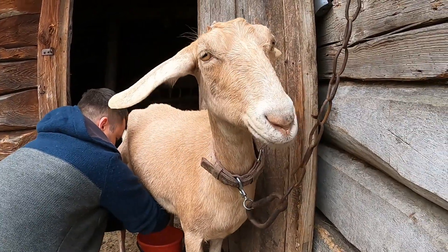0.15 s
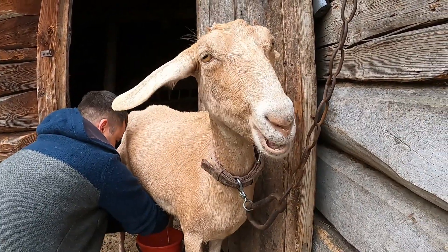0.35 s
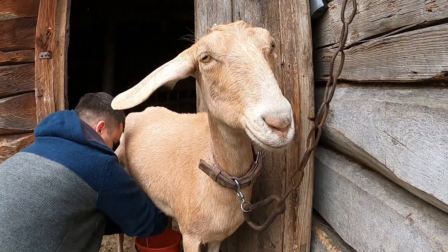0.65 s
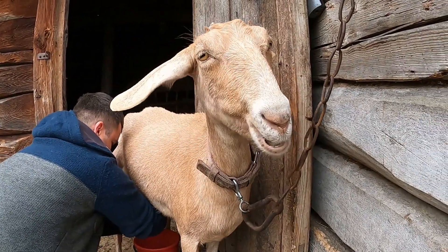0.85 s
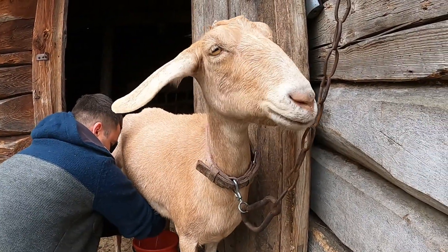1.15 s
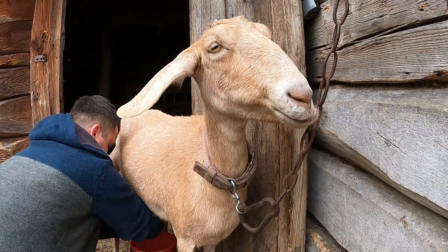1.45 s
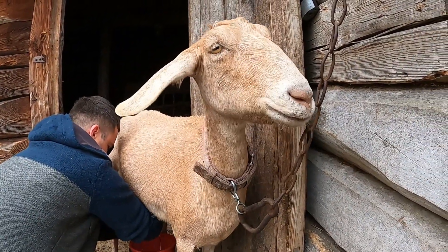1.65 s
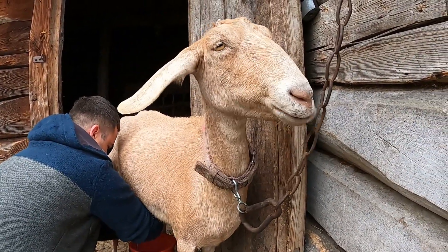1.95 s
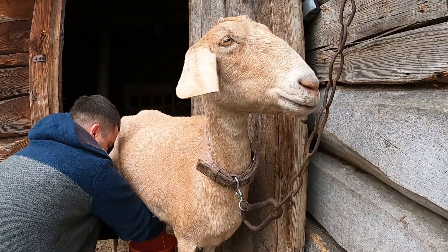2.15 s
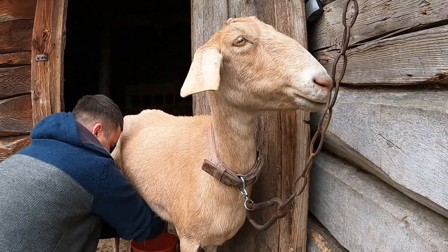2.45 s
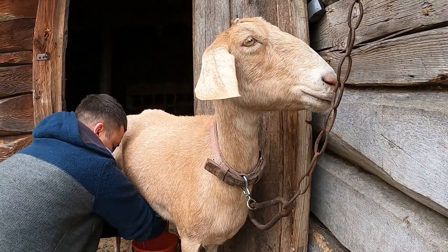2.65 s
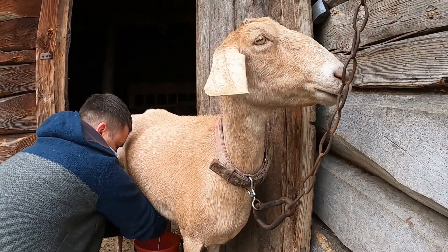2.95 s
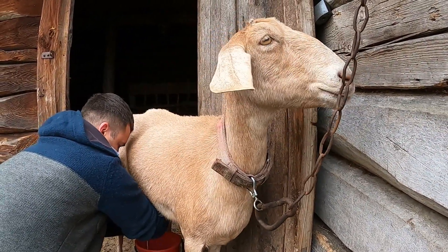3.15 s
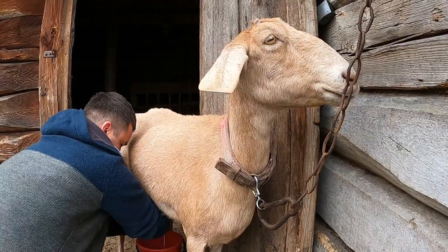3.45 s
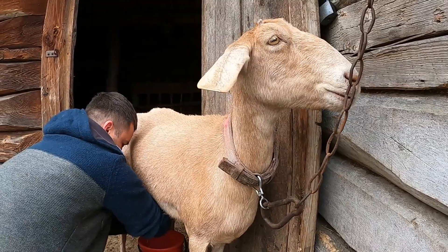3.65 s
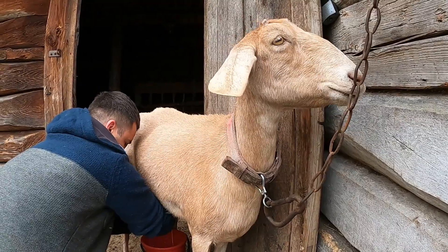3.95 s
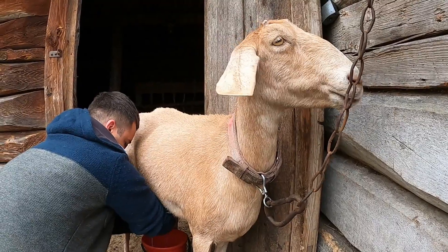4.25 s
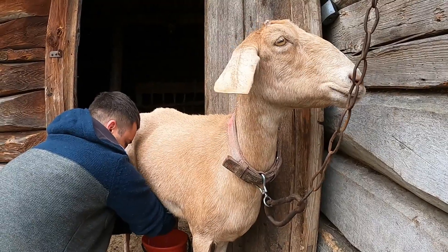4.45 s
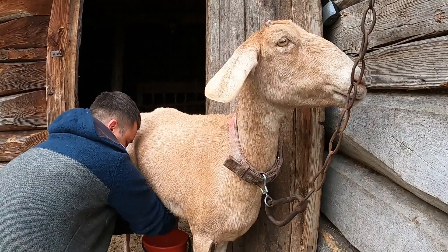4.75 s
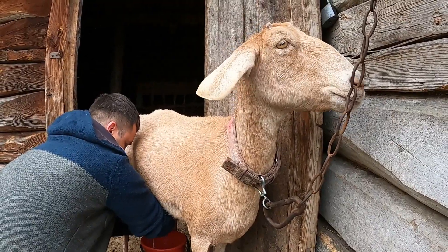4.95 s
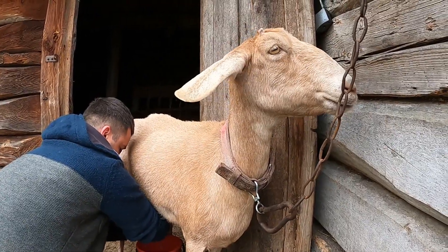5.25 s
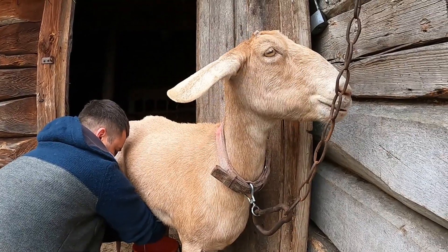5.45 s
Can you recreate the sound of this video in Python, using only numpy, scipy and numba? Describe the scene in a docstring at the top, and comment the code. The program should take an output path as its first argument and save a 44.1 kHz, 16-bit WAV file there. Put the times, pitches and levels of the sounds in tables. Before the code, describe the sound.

Jets of milk squirt rhythmically into a frothy plastic pail, ringing and gurgling, with sharp splats, small glugs and a few dull floor thumps.

```python
"""Jets of milk drive into the froth in a plastic pail as a goat is milked by hand in a barn doorway.
The jets are random drops and bubbles ringing the pail, with a gurgle, a hollow note and hissing spray.
Gouts of milk splat as short rings and noise bursts; big bubbles glug as pairs of climbing tones.
Dull thumps through the wooden floor are low dying tones over rumbling noise.
Bands of faint noise make the farmyard hush."""
import sys
import numpy as np
from scipy import signal
from scipy.io import wavfile
from scipy.ndimage import uniform_filter1d
from numba import njit

SR = 44100
rng = np.random.default_rng(int(sys.argv[2]) if len(sys.argv) > 2 else 0)


def inscribe(sig):
    """Save sig as 16-bit PCM at rate SR to the path in sys.argv[1].

    A 1-D sig is mono; a 2-D sig holds one channel per row.
    Samples are clipped to [-1, 1] before scaling.
    """
    pcm = np.round(np.clip(np.atleast_2d(sig).T, -1, 1) * 32767)
    wavfile.write(sys.argv[1], SR, pcm.astype(np.int16))


N = 247460  # length in samples
STEP_S = 0.002  # spacing of the slow level curves
LEFT_RIGHT = np.array([[1], [-1]])  # opposite signs in the two channels


def undb(db):
    """Turn decibels into a gain."""
    return 10 ** (np.asarray(db) / 20)


def unit(x):
    """Scale a sound to an average (rms) level of 1."""
    return x / np.sqrt(np.mean(x ** 2))


def curve(table):
    """Join the rows of a table by straight lines in time, one curve per column."""
    s, *columns = np.transpose(table)
    return [np.interp(np.arange(N) / SR, s, c) for c in columns]


def smooth(v):
    """Join values spaced STEP_S apart, sample by sample."""
    return np.interp(np.arange(N) / SR, np.arange(len(v)) * STEP_S, v)


def walk(rate):
    """Wander at random: levels held for 1 / rate seconds, then smoothed twice; spread near 1."""
    k = int(SR / rate)
    steps = np.repeat(rng.standard_normal(N // k + 1), k)
    return 0.82 * uniform_filter1d(uniform_filter1d(steps, k), k)[:N]


@njit
def sweep(x, hz, width):
    """Resonance (state-variable band-pass) whose centre can move; gain 1 at the centre."""
    y, band, low = np.empty(len(x)), 0., 0.
    for i in range(len(x)):
        g, k = np.tan(np.pi * hz[i] / SR), width / hz[i]
        v = (band + g * (x[i] - low)) / (1 + g * (g + k))
        band, low, y[i] = 2 * v - band, low + 2 * g * v, k * v
    return y


def svf(x, hz, width):
    """Resonance that stays at one pitch."""
    return sweep(x, np.full(len(x), hz), width)


@njit
def grains(n, sr, start, hz, t60, rise, size, glide):
    """Tones that swell over rise s, then die by 60 dB in t60 s; pitch climbs by the share glide per t60."""
    out = np.zeros(n)
    for e in range(len(start)):
        i0, up, span, phase = int(start[e] * sr), rise[e] * sr, t60[e] * sr, 0.
        for j in range(min(int(up + span), n - i0)):
            phase += 2 * np.pi * hz[e] * (1 + glide * j / span) / sr
            level = size[e] * min(1., j / up) * 1000. ** (-max(0., j - up) / span)
            out[i0 + j] += level * np.sin(phase)
    return out


def ring(x, modes, slosh_db, drift):
    """Sum of resonances; sloshing milk moves each one's strength and pitch."""
    out = 0
    for k, (hz, width, db) in enumerate(modes):
        gain = (-1) ** k * undb(db + slosh_db * walk(40))
        out = out + gain * sweep(x, hz * (1 + drift * walk(9)), 1. * width)
    return out


def coloured(spectrum, flicker_db, wide_hz):
    """Third-octave noise bands that flicker separately; the channels differ more with rising pitch."""
    f, db = np.transpose(spectrum)
    out = 0
    for hz in f[0] * 2 ** np.arange(0, np.log2(f[-1] / f[0]), 1 / 3):
        mid, side = (svf(rng.standard_normal(N), hz, hz / 4) for _ in range(2))
        gain = undb(np.interp(np.log(hz), np.log(f), db) + flicker_db * walk(45))
        out = out + gain * (mid + min(hz / wide_hz, .42) * side * LEFT_RIGHT)
    return unit(out)


def drops(count, scatter_db):
    """Drops that land at random as single clicks; a few are much bigger than the rest."""
    when, big, sign = rng.random((count, 3)).T
    clicks = np.sign(sign - .5) * undb(-scatter_db * np.log(1.003 - big))
    x = np.zeros(N)
    np.add.at(x, (when * N).astype(int), clicks)
    return unit(x)


def bubbles(count, low_hz, high_hz, cycles, scatter_db):
    """Random bubbles whose pitch climbs as they near the surface."""
    when, pitch, big = rng.random((count, 3)).T
    hz = low_hz * (high_hz / low_hz) ** pitch
    size = undb(-scatter_db * np.log(1.01 - big))
    return unit(grains(N, 1. * SR, when * N / SR, hz, cycles / hz, 1.5 / hz, size, 0.28))


def clumps(count, length_s, depth):
    """The stream arrives in short lumps: a gain that jumps for a few milliseconds at random."""
    k = int(length_s * SR)
    lumps = np.abs(drops(count=count, scatter_db=0.5))
    lumps = uniform_filter1d(uniform_filter1d(lumps, k), k)
    return unit(1 + depth * lumps / np.mean(lumps))


EDGE_DB = 30.5  # a swell lies this far down at its ends
RISE_BEND, FALL_BEND = 1.37, 0.66  # larger = rounder top
SPRAY_STEP_DB, SPRAY_ONSET_S = 23, 0.006  # size and duration of the quick jump in spray


def swells(top, rise, hold, fall, db, lead=9, step_db=0):
    """Power of each swell as it rises, holds and falls; it may jump up lead s before its top."""
    t = np.arange(0, N / SR, STEP_S)[:, None]
    before = np.clip((top - t) / rise, 0, 5)
    after = np.clip((t - top - hold) / fall, 0, 5)
    shut = np.clip((top - lead - t) / SPRAY_ONSET_S, 0, 1)
    drop_db = EDGE_DB * (before ** RISE_BEND + after ** FALL_BEND) + step_db * shut
    return undb(db - drop_db) ** 2 + 1e-18


# Squirts of milk; each layer may shift or stretch the times:
# top_s, rise_s, hold_s, fall_s, level_db, gurgle_db and spray_db (both relative to level_db),
# spray_lead_s (spray jumps up this long before top_s), hollow_db (relative), hollow_pitch_hz
SQUIRTS = [(0.0, 0.26, 0.085, 0.33, -52, -2.5, -11.5, .05, -8.5, 1030),
           (0.242, 0.069, 0.036, 0.23, -56.5, -7.5, -6, 0.0053, -5.5, 1310),
           (0.569, 0.14, 0.15, 0.72, -53, -1.5, -6.5, 0.078, 2, 1180),
           (0.696, 0.32, 0.073, 0.43, -44, -5, -17.5, 0.12, -2.5, 1080),
           (0.852, 0.088, 0.029, .1, -55.5, -8, -27, .05, 2, 1070),
           (1.173, 0.11, 0.13, 0.39, -47.5, -3.5, -9.5, 0.093, 1.5, 1228),
           (1.44, 0.12, 0.027, 0.38, -43, -2.5, -12.5, 0.14, -9.5, 1090),
           (1.767, 0.2, 0.13, 0.37, -46.5, -4.5, -10.5, 0.06, -2, 1256),
           (2.003, 0.15, 0.06, 0.2, -62, -6, 0.5, 0.058, -19, 1100),
           (2.105, 0.054, 0.065, 0.067, -51.5, -3.5, -8.5, 0.02, -7, 1236),
           (2.194, 0.026, 0.016, 0.031, -61, 2, -22, .01, -6, 1210),
           (2.452, 0.21, 0.067, 0.13, -47.5, -1.5, -7, 0.0815, 2, 1242),
           (2.672, 0.084, 0.069, 0.18, -52.5, 2.5, -11, 0.02, -6, 1240),
           (2.766, 0.2, 0.043, 0.89, -56.5, -1.5, -10.5, 0.05, -3, 1270),
           (3.083, 0.18, 0.083, 0.15, -49, 3.5, -11, 0.13, -1.5, 1150),
           (3.247, 0.1, 0.061, 0.33, -47, -3, -9.5, 0.066, -1.5, 1060),
           (3.341, 0.074, 0.04, 0.14, -50, -3, -27, .02, 3, 925),
           (3.452, 0.059, 0.04, 0.053, -66, 6.5, -21, .03, -1, 1190),
           (3.631, 0.13, 0.095, 0.19, -49.5, 0.5, -12.5, 0.098, -4.5, 1180),
           (3.906, 0.077, 0.019, 0.16, -43.5, -5.5, -6, 0.051, 0, 1050),
           (3.972, 0.19, 0.091, 0.53, -54, 2, -24, .05, -7.5, 1190),
           (4.224, 0.17, 0.062, 0.12, -52.5, -3.5, -10.5, 0.091, 0.5, 1265),
           (4.468, 0.11, 0.052, 0.26, -49, -1.5, -8, 0.063, -6.5, 1120),
           (4.79, 0.14, 0.066, 0.097, -48.5, -4, -9.5, 0.077, -0.5, 1140),
           (4.996, 0.16, 0.095, 0.47, -51, -3.5, -15, 0.037, -7.5, 1130),
           (5.226, 0.021, 0.004, 0.16, -42, -20, -7.5, 0.0041, -6.5, 1135),
           (5.319, 0.06, 0.082, 0.28, -58.5, -1, -15, 0.052, 2.5, 1280),
           (5.41, .04, 0.051, 0.046, -58, -1, -26, .02, -13, 1230),
           (5.602, 0.087, .05, .2, -43, -6.5, -13.5, 0.093, 2, 1020)]


def flow(relative_db, lag_s, slow_rise, slow_fall, **jump):
    """Gain of a layer that follows the squirts, shifted and stretched in time."""
    top, rise, hold, fall, db = np.transpose(SQUIRTS)[:5]
    power = swells(top + lag_s, slow_rise * rise, hold, slow_fall * fall, db + relative_db, **jump)
    return smooth(np.sqrt(power.sum(axis=1)))


HOLLOW_LAG_S, HOLLOW_RISE_SLOWER = 0.009, 0.72  # the note sets in only once the hole is bored
HOLLOW_SLOWER, HOLLOW_SAG_HZ_PER_S = 0.63, 570  # fall stretch; the note sinks as the hole deepens


def hollow(stream):
    """The hole bored in the froth sings: a narrow air resonance that slides and flutters."""
    top, rise, hold, fall, db, *_, note_db, note_hz = np.transpose(SQUIRTS)
    share = swells(top, rise, hold, fall, db)
    since_s = np.clip(np.arange(len(share))[:, None] * STEP_S - top, -rise, hold + fall)
    sinking_hz = note_hz - HOLLOW_SAG_HZ_PER_S * since_s
    # the strongest squirt has most say in the pitch
    hz = smooth((share * sinking_hz).sum(axis=1) / share.sum(axis=1))
    hz = hz * (1 + 0.066 * walk(40))
    note = unit(sweep(sweep(stream, hz, 230.0), hz, 163.0))
    level = flow(note_db, HOLLOW_LAG_S, HOLLOW_RISE_SLOWER, HOLLOW_SLOWER)
    return note * level * undb(4.2 * walk(110))


# Resonances of the pail with its milk (also used by the splats): pitch_hz, width_hz, level_db (relative)
PAIL = [(852, 170, -2), (1266, 655, -2.5), (1643, 195, 3), (2007, 410, -3), (2368, 166, 1.5),
        (2717, 175, -4), (3260, 420, -7.5), (4880, 690, -16.5)]


def pail_and_froth(stream, waver):
    """Drops ring the pail while small bubbles ring in the froth."""
    pail = unit(ring(stream, PAIL, slosh_db=3.0, drift=0.066))
    froth = bubbles(count=2500, low_hz=567.0, high_hz=3397, cycles=47.0, scatter_db=3.0)
    return unit(pail + undb(-3.5) * froth) * flow(0, 0, 0.82, 0.84) * undb(2.0 * waver)


GURGLE_LAG_S, GURGLE_SLOWER = 0.011, 1.11  # air keeps bubbling up after the jet
GURGLE_SIDE_DB = -10.5  # part of the gurgle differs between the channels
# Resonances of big bubbles under the froth: pitch_hz, width_hz, level_db (relative)
GURGLE = [(164.6, 30.3, -3), (244, 38, -0.5), (329, 58, 0), (379.8, 106, 2.5), (444.4, 206, -3.5),
          (670, 200, -13.5)]


def froth_gurgle():
    """Big bubbles gurgle under the froth: random clicks ring low resonances."""
    middle = unit(ring(drops(count=6000, scatter_db=1.5), GURGLE, slosh_db=1.0, drift=0.066))
    side = unit(ring(drops(count=6000, scatter_db=1.5), GURGLE[1:], slosh_db=2.5, drift=0.077))
    churn = middle + undb(GURGLE_SIDE_DB) * side * LEFT_RIGHT
    gurgle_db = np.transpose(SQUIRTS)[5]
    level = flow(gurgle_db, GURGLE_LAG_S, GURGLE_SLOWER, GURGLE_SLOWER)
    return churn * level * undb(0.39 * walk(29.1))


SPRAY_RISE_SLOWER, SPRAY_FALL_SLOWER = 1.16, 0.79  # stretch of the spray's rise and fall
# Colour of the hissing spray (also used by the splats): pitch_hz, level_db_per_hz (relative)
SPRAY = [(2060, -7), (3500, -1), (4330, 7), (5090, -6), (5480, -1), (8470, -7), (10500, -28), (13300, -51),
         (14600, -46), (15500, -62)]


def mist(lumpy, waver):
    """Tiny bubbles fizz and spray hisses; both set in quickly, then creep up to the top."""
    spray_db, lead_s = np.transpose(SQUIRTS)[6:8]
    level = flow(spray_db, 0, SPRAY_RISE_SLOWER, SPRAY_FALL_SLOWER, lead=lead_s, step_db=SPRAY_STEP_DB)
    fizz = bubbles(count=5000, low_hz=2400, high_hz=9160, cycles=22.0, scatter_db=5.0)
    droplets = fizz * level * undb(-3.5 + 1.0 * waver)
    hiss = coloured(SPRAY, flicker_db=5.0, wide_hz=7540)
    spray = lumpy ** 0.56 * hiss * level * undb(0.35 * waver)
    return droplets, spray


def jet():
    """The stream breaks into drops that ring the pail and whip up froth; its flow wavers quickly."""
    waver = walk(45)
    lumpy = clumps(count=450, length_s=0.0024, depth=0.31)
    stream = lumpy * (drops(count=40000, scatter_db=1.5) + 0.41 * rng.standard_normal(N))
    droplets, spray = mist(lumpy, waver)
    body = pail_and_froth(stream, waver) + droplets + hollow(stream)
    return body, froth_gurgle(), spray


# Thumps through the floor: start_s, level_db, pitch_hz, ring_s
THUMPS = [(0.033, -45, 61.7, 0.4), (0.217, -49.5, 60.6, 0.16), (0.405, -35.5, 64, 0.15),
          (0.701, -34.5, 59.9, 0.1), (1.053, -44, 54.2, 0.05), (1.379, -35, 55.4, 0.091),
          (1.583, -51.5, 83, 0.27), (1.645, -58, 70, 0.15), (1.74, -41.5, 55.7, 0.075),
          (1.877, -47, 76.4, 0.22), (2.087, -49, 63.3, 0.13), (2.902, -45.5, 59.5, 0.29),
          (3.926, -51, 41.4, 0.051), (4.224, -58.5, 67.6, 0.42), (4.849, -51, 56.7, 0.078)]


def thumps():
    """A thump is a few slow swings of the boards and a weaker bounce."""
    s, db, hz, ring_s = np.transpose(THUMPS)
    first = grains(N, 1. * SR, s, hz, ring_s, 1.92 / hz, undb(db), 0.033)
    bounce = grains(N, 1. * SR, s + 0.0297, 1.29 * hz, ring_s, 0.47 / hz, undb(db - 4.0), 0.053)
    return first + bounce


# Low rumble that swells and fades: time_s, level_db
RUMBLE = [(0.0, -62), (0.75, -81), (1.1, -64.5), (1.75, -56), (2.1, -73), (2.8, -69), (3.6, -65.5),
          (4.2, -76), (5.61, -77.5)]
# One deep shudder: top_s, rise_s, hold_s, fall_s, level_db
SHUDDER = (3.03, .13, .24, .18, -48)
SHUDDER_REST_DB = -77  # faint steady level under the shudder


def floor_rumble():
    """Two bands of low noise: a deep one that shudders once and an upper one that swells."""
    deep, upper = (unit(svf(svf(rng.standard_normal(N), hz, width), hz, width))
                   for hz, width in ((19., 18.0), (68., 107.0)))
    shudder = smooth(np.sqrt(swells(*SHUDDER)[:, 0])) + undb(SHUDDER_REST_DB)
    return shudder * deep + undb(curve(RUMBLE)[0]) * upper


HUSH_DB = -73  # overall level
# Colour of the hush: pitch_hz, level_db_per_hz (relative)
HUSH = [(59, -19), (100, 7), (227, 17.5), (416, -17), (718, -24), (1290, 8), (2320, -9), (6480, 2.5),
        (12200, -52), (15000, -59)]


def farmyard_hush():
    """Faint noise whose bands flicker separately."""
    return undb(HUSH_DB) * coloured(HUSH, flicker_db=4.0, wide_hz=5000)


def bursts(s, peak_db, ring_s, rise_s):
    """Envelope of quick swells that top out 3.5 ms after the listed time, then die away."""
    out, t = np.zeros(N), np.arange(N) / SR
    for at, db, t60, up in np.broadcast(s, peak_db, ring_s, rise_s):
        top = at + 0.0035
        near = slice(max(int((top - up) * SR), 0), int((top + 2 * t60) * SR))
        swell = np.clip(1 + (t[near] - top) / up, 0, 1) ** 2
        fade = undb(-60 * np.clip(t[near] - top, 0, 1) / max(t60, .005))
        out[near] += undb(db) * swell * fade
    return out


SPLAT_RISE_SHARE = 0.092  # a longer ring also builds up more slowly
# Hard splats of milk; each layer trims the levels and some shorten the ring:
# start_s, level_db, pitch_hz, spray_db (relative to level_db), ring_s
SPLATS = [(0.183, -39, 1530, -14, 0.02), (0.2446, -27, 1550, -41, 0.012), (0.422, -44.5, 3320, -4.5, 0.1),
          (0.515, -33, 780, -34, 0.023), (0.529, -39, 2300, -27, 0.04), (0.5955, -28.5, 2210, -18, 0.03),
          (0.679, -26.5, 3000, -5.5, 0.13), (0.692, -26.5, 1980, -20, 0.098),
          (0.7434, -27.5, 1070, -41, 0.06), (0.753, -24, 1090, -25, 0.04), (0.7648, -38, 1170, -32, 0.028),
          (0.8193, -31, 1038, -55, 0.13), (0.8522, -31, 1000, -54, 0.029), (1.016, -46, 1310, -30, 0.05),
          (1.164, -27.5, 1300, -35, 0.021), (1.2153, -25.5, 1155, -18, 0.062),
          (1.243, -33, 1150, -30, 0.025), (1.254, -28, 1270, -19, 0.11), (1.297, -22.5, 1190, -36, 0.04),
          (1.33, -31.5, 1120, -12, 0.045), (1.4134, -41.5, 2080, 5.5, 0.098),
          (1.428, -14.5, 2194, -12, 0.031), (1.445, -26.5, 2070, -26, 0.1), (1.469, -27, 2520, -22, 0.028),
          (1.6922, -27.5, 1405, -33, 0.026), (1.802, -28, 1700, -34, 0.061),
          (1.8532, -23.5, 1240, -17.5, 0.095), (2.068, -32, 1500, -22, 0.015),
          (2.1059, -25, 2050, -8.5, 0.015), (2.155, -25.5, 1490, -30, 0.018),
          (2.163, -29, 1740, -30, 0.018), (2.195, -35, 1505, -21, 0.045), (2.357, -41, 1890, -39, 0.02),
          (2.466, -28.5, 1330, -10.5, 0.06), (2.478, -25, 1300, -25, 0.044), (2.497, -24, 790, -30, 0.036),
          (2.5085, -22.5, 1265, -41, 0.095), (2.519, -21.5, 2980, -29, 0.034),
          (2.536, -28, 2330, -14, 0.012), (2.6427, -40, 1610, -34, 0.076), (2.661, -31.5, 1430, -24, 0.028),
          (2.7, -30.5, 1275, -20, 0.045), (2.812, -36, 2260, -9, 0.018), (2.999, -30, 1740, -18, 0.06),
          (3.029, -33, 1110, -26, 0.086), (3.1246, -29, 1130, -17, 0.21), (3.1757, -31.5, 1800, -30, 0.029),
          (3.2382, -15, 2926, -16.5, 0.023), (3.2785, -21.5, 2030, -18, 0.045),
          (3.29, -19.5, 1904, -30, 0.05), (3.301, -20.5, 2244, -36, 0.028),
          (3.815, -43.5, 2980, -12, 0.017), (3.845, -40.5, 2260, -4, 0.071), (3.8638, -30, 2900, -11, 0.06),
          (3.8905, -24.5, 1075, -26, 0.094), (3.911, -11, 2515, -26, 0.036), (3.926, -25, 2330, -22, 0.13),
          (4.05, -38, 1490, -25, 0.026), (4.1017, -34, 1550, -21, 0.026), (4.153, -41, 1720, -16, 0.022),
          (4.171, -42, 1280, -27, 0.028), (4.2235, -32.5, 1240, -25, 0.023), (4.241, -39, 1440, -25, 0.05),
          (4.256, -33.5, 1210, -6.5, 0.17), (4.3347, -36.5, 1520, -33, 0.023),
          (4.4727, -30.5, 2126, -17, 0.089), (4.796, -20, 1150, -22, 0.036), (4.803, -27, 2500, -24, 0.03),
          (5.0044, -21, 2310, -18.5, 0.07), (5.018, -31, 2090, -18, 0.028), (5.039, -30, 1570, -10, 0.16),
          (5.061, -18, 2400, -19.5, 0.04), (5.222, -23, 2410, -17, 0.027), (5.2287, -19.5, 2350, -26, 0.04),
          (5.342, -34, 1820, -30, 0.028), (5.364, -31, 1295, -15.5, 0.032), (5.565, -34, 2800, -6, 0.081),
          (5.5788, -24, 2140, -29, 0.015), (5.586, -32, 1047, -40, 0.12)]


def splats():
    """Each gout of milk rings at its own pitch, shakes the pail and throws spray."""
    s, db, hz, spray_db, ring_s = np.transpose(SPLATS)
    own = grains(N, 1. * SR, s, hz, 0.42 * ring_s, 0.0024 + 0 * hz, undb(db - 10.5), 0.14)
    shaken = unit(ring(rng.standard_normal(N), PAIL, slosh_db=4.0, drift=0.054))
    # the splash is strongest around the pitch of the nearest gout
    nearest_hz = hz[np.searchsorted((s[1:] + s[:-1]) / 2, np.arange(N) / SR)]
    focused = unit(sweep(shaken + 0.27 * rng.standard_normal(N), nearest_hz, 1100.0))
    splash = unit(1.03 * shaken + focused)
    rise_s = 0.0016 + SPLAT_RISE_SHARE * ring_s
    pail = splash * bursts(s, db - 15.0, 0.76 * ring_s, rise_s)
    # coarser drops sound duller
    dull = signal.butter(1, 7000, fs=SR, output="sos")
    hiss = signal.sosfilt(dull, coloured(SPRAY, flicker_db=1.0, wide_hz=8950))
    spray = hiss * bursts(s, db + spray_db - 9.5, ring_s, 2.6 * rise_s)
    return own + pail, spray


# Colour of the spatters: pitch_hz, level_db_per_hz (relative)
SPATTER_COLOUR = [(2000, -8), (3600, -5), (6300, 2), (9000, -8), (15000, -34)]
# Bright spatters on the pail wall: start_s, level_db, ring_s
SPATTERS = [(0.304, -59.5, 0.13), (0.476, -52, 0.0089), (0.485, -41.5, 0.0046), (0.893, -55.5, 0.0074),
            (1.965, -42, 0.098), (1.981, -47.5, 0.09), (1.992, -53, 0.019), (2.116, -52, 0.059),
            (2.537, -59, 0.013), (2.811, -64, 0.024), (3.222, -50, 0.015), (4.845, -58, 0.025),
            (4.97, -52, 0.05), (5.199, -57, 0.027)]


def spatters():
    """Bright spatters on the pail wall: short bursts of flickering high noise."""
    noise = coloured(SPATTER_COLOUR, flicker_db=13.0, wide_hz=9000)
    return noise * bursts(*np.transpose(SPATTERS), rise_s=0.0031)


# Large bubbles; the two tones trim the level and the second changes pitch and ring:
# start_s, level_db, pitch_hz, ring_s
GLUGS = [(0.408, -45.5, 204, 0.035), (0.513, -46.5, 391, 0.71), (0.576, -41.5, 427, 0.089),
         (0.686, -36.5, 490, 0.08), (1.132, -43.5, 360, 0.13), (1.166, -38.5, 391, 0.13),
         (1.224, -36.5, 182, 0.037), (1.326, -43.5, 427, 0.11), (1.489, -38.5, 373, 0.14),
         (1.893, -38.5, 225, 0.22), (1.927, -36.5, 399, 0.13), (2.11, -40.5, 393, 0.045),
         (2.163, -44.5, 166.3, 0.16), (2.394, -41.5, 364, 0.074), (2.514, -47, 350, 0.074),
         (2.548, -48.5, 291, 0.16), (2.696, -36, 298, 0.044), (2.915, -34.5, 199, 0.0096),
         (3.048, -33.5, 334, 0.039), (3.125, -47, 228, 0.057), (3.235, -39.5, 393, 0.21),
         (3.292, -32.5, 369, 0.099), (3.598, -42.5, 378, 0.14), (3.682, -41.5, 180, 0.053),
         (3.925, -34, 353, 0.083), (3.995, -35, 346.7, 0.17), (4.015, -34, 363, 0.084),
         (4.194, -39.5, 390, 0.052), (4.465, -36.5, 340, 0.13), (4.51, -38.5, 172, 0.05),
         (4.757, -41.5, 396, 0.095), (4.846, -43, 426, 0.13), (4.999, -39.5, 300, 0.037),
         (5.061, -38, 240, 0.22), (5.165, -44, 369, 0.11), (5.37, -45.5, 420, 0.069),
         (5.412, -40, 233, 0.056), (5.453, -29.5, 229, 0.029)]


def glugs():
    """Air pockets close under the froth: each warbles as two close pitches and wobbles in strength."""
    s, db, hz, ring_s = np.transpose(GLUGS)
    twin = 1 + 0.149 * rng.standard_normal(len(s))
    main = grains(N, 1. * SR, s, hz, ring_s, 1.49 / hz, undb(db - 2.0), 0.073)
    # short plops have a weaker second tone
    second_size = undb(db - 6.5) * np.clip(ring_s / 0.06, 0, 1) ** 2
    second = grains(N, 1. * SR, s + 0.00602, twin * hz, 1.5 * ring_s, 3.6 / hz, second_size, 0.1)
    return (main + second) * undb(1.9 * walk(150))


def doorway(x, t60_s, wet_db, bass_db):
    """Close planks return a brief scatter of echoes, different in each channel."""
    t = np.arange(int(.15 * SR)) / SR
    out = []
    for _ in range(2):
        noise = rng.standard_normal(len(t))
        bright = svf(svf(noise, 2560.0, 9600.0), 2300.0, 9900.0)
        low = undb(bass_db) * svf(noise, 120.0, 430.0)
        tail = (bright + low) * undb(-60 * t / t60_s) * (t > .002)
        echo = signal.fftconvolve(x, tail / np.sqrt(np.sum(tail ** 2)))[:N]
        out.append(x + undb(wet_db) * echo)
    return np.array(out)


PAIL_LEFT_LAG, SPRAY_LEFT_LAG = 2, 1  # samples; the spray comes from nearer the middle
SPRAY_LAG_BELOW_HZ = 11300  # the finest spray scatters and reaches both channels together
SPRAY_RIGHT_DB = 0.1  # how much stronger the spray is on the right


def scene():
    """The pail reaches the left a little later; boards are stronger on the left, spray on the right."""
    stream, gurgle, jet_spray = jet()
    boards = (thumps() + floor_rumble()) * undb([[.7], [-.7]])
    hush = farmyard_hush()
    splat, splat_spray = splats()
    treble = (jet_spray + splat_spray + spatters()) * undb(np.array([[-.5], [.5]]) * SPRAY_RIGHT_DB)
    near = doorway(stream + splat + glugs(), t60_s=0.093, wet_db=-12.0, bass_db=-4.5) + gurgle
    near[0] = np.pad(near[0], (PAIL_LEFT_LAG, 0))[:N]
    split = signal.butter(2, SPRAY_LAG_BELOW_HZ, fs=SR, output="sos")
    lower = signal.sosfiltfilt(split, treble[0])
    treble[0] += np.pad(lower, (SPRAY_LEFT_LAG, 0))[:N] - lower
    return near + boards + treble + hush


def record(dry):
    """The microphones dull the highest treble and everything above 15200 Hz is cut."""
    soft = signal.sosfilt(signal.butter(4, 13800, fs=SR, output="sos"), dry)
    return signal.sosfilt(signal.ellip(8, .2, 70, 15200, fs=SR, output="sos"), soft)


dry = scene()
out = record(dry)
inscribe(out)
```